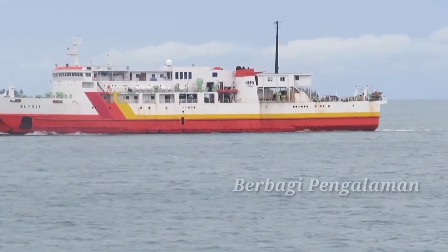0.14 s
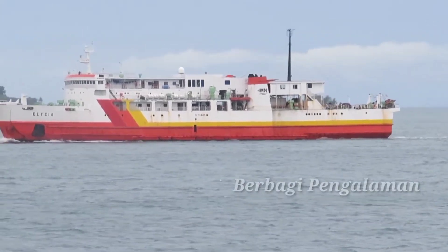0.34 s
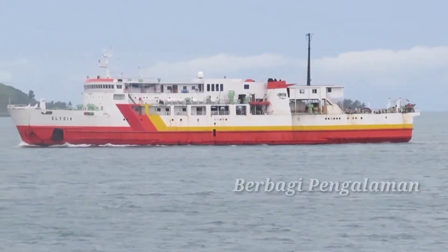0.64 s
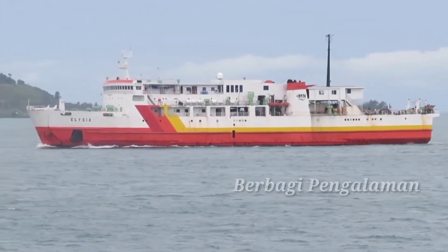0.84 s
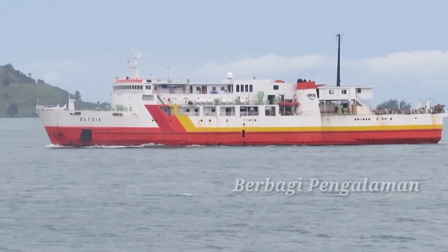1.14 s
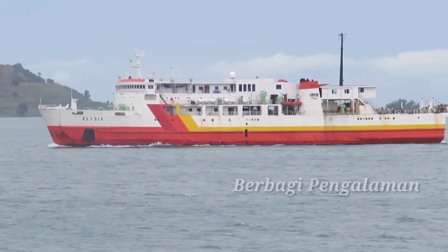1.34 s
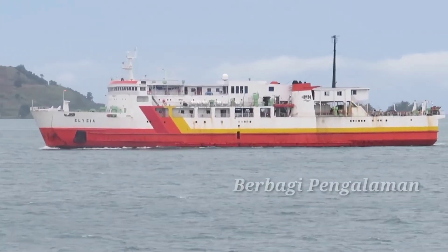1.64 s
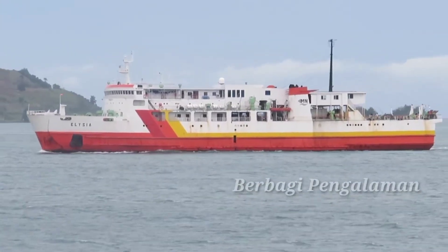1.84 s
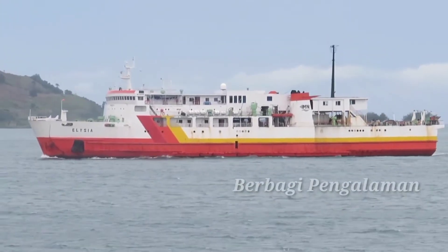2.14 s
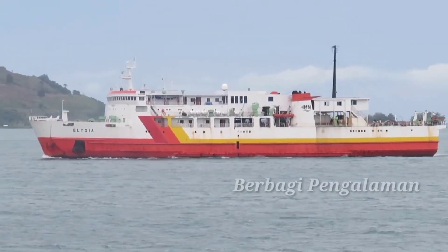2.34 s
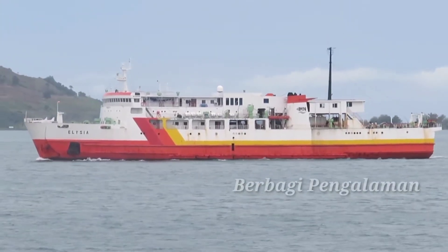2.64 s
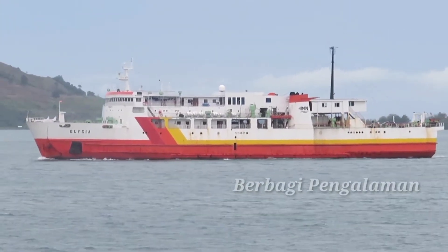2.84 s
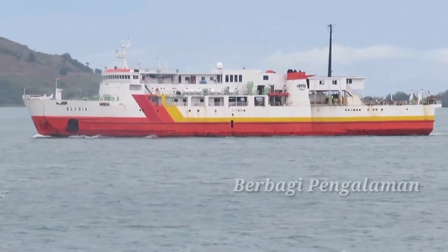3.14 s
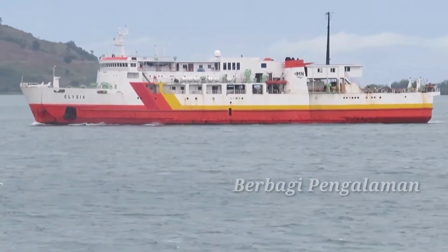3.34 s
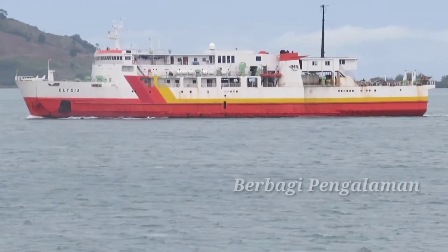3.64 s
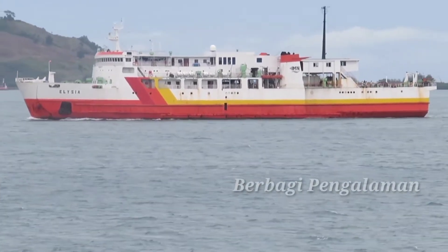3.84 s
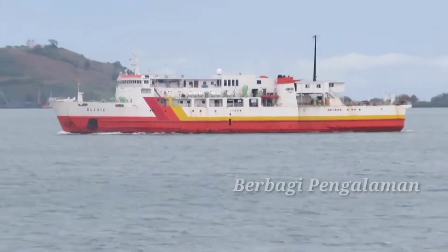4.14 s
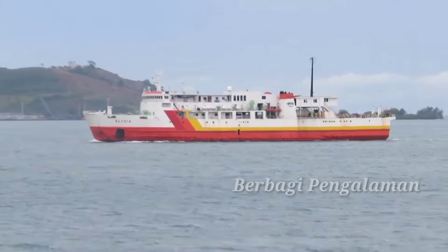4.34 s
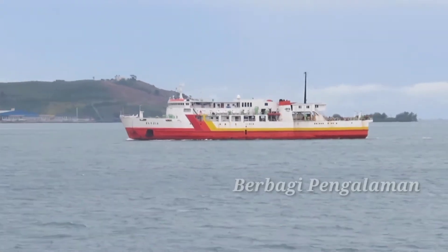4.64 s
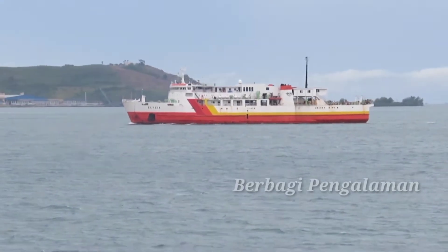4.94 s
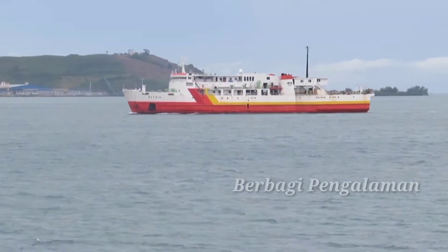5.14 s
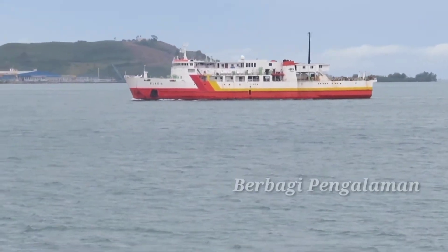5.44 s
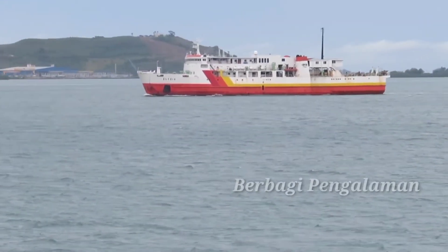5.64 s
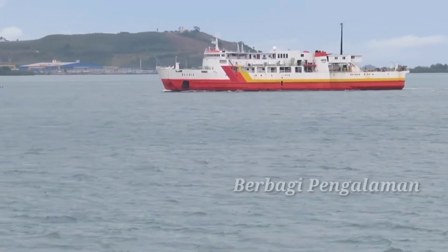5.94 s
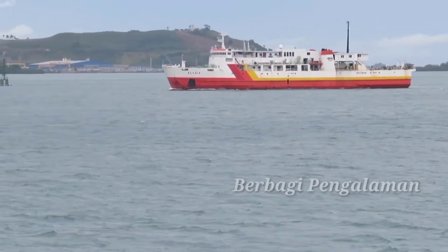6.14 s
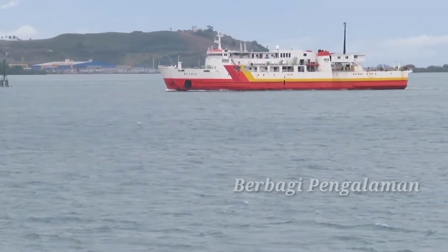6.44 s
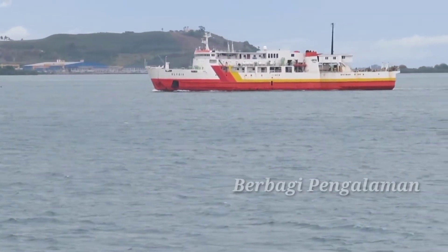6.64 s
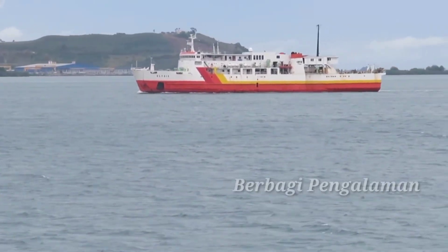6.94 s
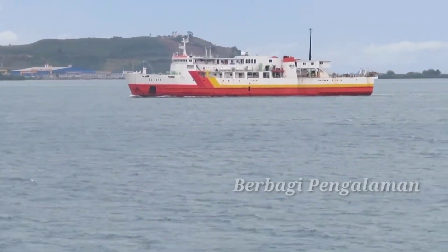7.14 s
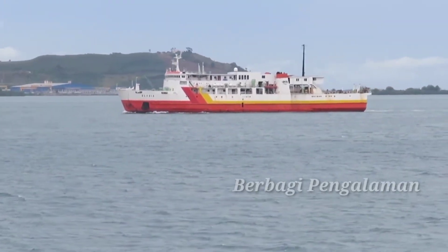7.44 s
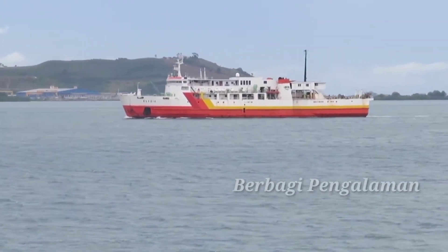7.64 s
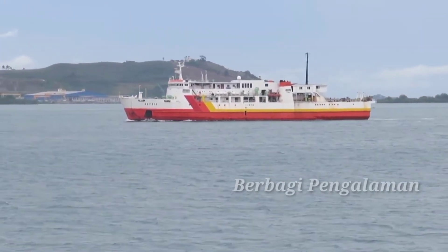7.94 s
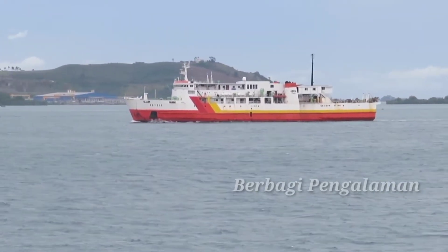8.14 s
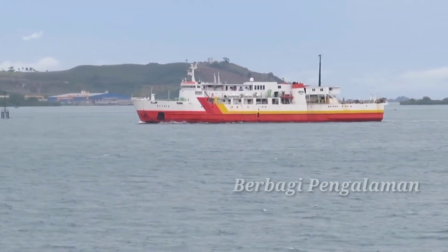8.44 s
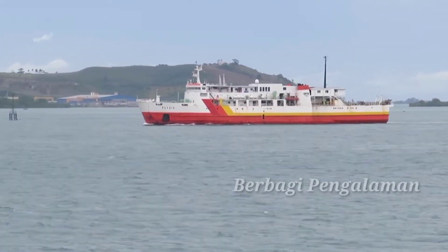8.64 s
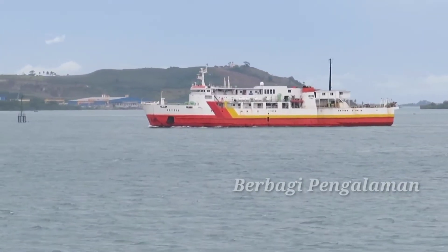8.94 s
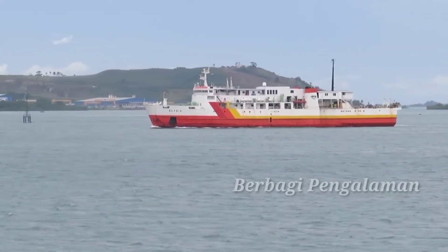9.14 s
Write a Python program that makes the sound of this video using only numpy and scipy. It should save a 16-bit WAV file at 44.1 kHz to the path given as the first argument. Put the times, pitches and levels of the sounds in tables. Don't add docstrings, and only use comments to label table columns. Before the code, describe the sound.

A ferry's diesel engine throbs and hums low and steady under hazy wash and wind, with dull metal booms and a brief camera zoom whine.

```python
import sys
import numpy as np
from scipy import signal
from scipy.fft import rfft, irfft, next_fast_len
from scipy.io import wavfile
from scipy.ndimage import uniform_filter1d

SR = 44100
rng = np.random.default_rng(int(sys.argv[2]) if len(sys.argv) > 2 else 0)


def to_wav(s):
    ch = np.atleast_2d(s).T
    pcm = np.round(np.clip(ch, -1, 1) * 32767)
    wavfile.write(sys.argv[1], SR, pcm.astype(np.int16))


def amplitude_ratio(level_db):
    exponent = np.asarray(level_db, float) / 20
    return 10 ** exponent


N = 410122
TIME = np.arange(N) / SR
PADDED = next_fast_len(N)
HZ = np.maximum(np.arange(PADDED // 2 + 1) * SR / PADDED, 1)
COARSE = 20
MOTOR_ON_S, FILTER_ON_S, ZOOM_END_S = 3.96, 4.11, 4.845


def in_time(rows):
    s, *columns = np.transpose(rows)
    return [np.interp(TIME, s, c) for c in columns]


def at_hz(rows, hz):
    f, *columns = np.transpose(rows)
    return [np.interp(np.log(hz), np.log(f), c) for c in columns]


def drift(rate, step=1):
    knots_per_s = 400
    knots = rng.standard_normal(int(N / SR * knots_per_s) + 900)
    r = np.exp(-2 * np.pi * rate / knots_per_s)
    slow = signal.lfilter([1], [1, -2 * r, r * r], knots)[800:]
    slow = (slow - slow.mean()) / slow.std()
    return np.interp(TIME[::step] * knots_per_s, np.arange(len(slow)), slow)


def tone(turns, db, wobble_db):
    level = amplitude_ratio((db + 0 * TIME)[::COARSE] + wobble_db * drift(0.41, COARSE))
    return np.sqrt(2) * level * np.sin(2 * np.pi * turns[::COARSE])


def narrow_noise(hz, width_hz):
    cut = signal.butter(2, width_hz / 2, fs=SR, output="sos")
    a, b = signal.sosfilt(cut, rng.standard_normal((2, len(hz) + 2000)))[:, 2000:]
    angle = 2 * np.pi * np.cumsum(hz) / SR
    band = a * np.cos(angle) + b * np.sin(angle)
    return band / band.std()


def struck(events, rise_s, gain_db):
    out = np.zeros(N)
    for s, db, hz, t60 in events:
        at = round(s * SR)
        t = TIME[:N - at][:SR // 2]
        envelope = amplitude_ratio(db + gain_db - 60 * t / t60) * (1 - np.exp(-t / rise_s))
        out[at:at + len(t)] += envelope * np.sin(2 * np.pi * hz * t)
    return out


# time of change in seconds, rms level in dB before, and after.
FIRING = [
    (2.4, -31, -41),
    (2.4, -21.5, -28),
    (5.1, -39.5, -25),
]


def firing_db():
    turn_s = .3
    return [before_db + (after_db - before_db) * (1 + np.tanh((TIME - s) / turn_s)) / 2
            for s, before_db, after_db in FIRING]


# time in seconds, four-stroke cycles per second.
SPEED = [(0, 3.176), (1.2, 3.178), (2.3, 3.1777), (3.5, 3.171), (4.6, 3.167), (5.8, 3.166), (7, 3.171),
         (8.1, 3.1735), (9.3, 3.174)]
UNEVEN_DB = [-44.5, -57.5, -36, -33.5, -36.5, -45, -26.5, -93.5, -29, -42, -31, -27, -31, -42, -34, -84,
             -48, -50.5, -48.5, -47.5, -34.5, -38.5, -44, -34, -52, -41.5, -35, -41]
# order, rms level in dB.
UPPER_ORDERS = [(40, -48), (43, -46), (45, -49), (48, -50), (51, -47), (61, -53), (62, -49), (63, -50)]
# time in seconds, rms level in dB.
GENERATOR_DB = [(0, -15.5), (2.3, -16), (4.8, -14), (7, -16), (9.3, -15)]
# harmonic number, rms level in dB.
AUXILIARY = [(3, -40), (4, -33), (8, -42), (12, -48), (16, -50), (24, -44)]


def engines():
    generator_hz, auxiliary_hz = 75.06, 12.11
    opposed_s = 5.84
    cycle = np.cumsum(in_time(SPEED)[0]) / SR
    out = sum(tone(8 * (k + 1) * cycle, db, wobble_db=.4) for k, db in enumerate(firing_db()))
    for k, db in [*enumerate(UNEVEN_DB, 9), *UPPER_ORDERS]:
        out += tone(k * cycle + rng.random(), db, wobble_db=0.75)

    generator = generator_hz * (TIME - opposed_s) + 24 * cycle[round(opposed_s * SR)] + .5
    hum_db = in_time(GENERATOR_DB)[0]
    out += tone(generator, hum_db, wobble_db=0.5)
    out += tone(2 * generator, hum_db - 26, wobble_db=2.0)
    for k, db in AUXILIARY:
        out += tone(k * auxiliary_hz * TIME + rng.random(), db, wobble_db=1.0)
    return signal.resample_poly(out, COARSE, 1, padtype="line")[:N]


PANEL_HZ = (286.2, 383, 453)
# start in seconds, peak level in dB, upper modes relative to the lowest in dB.
BOOMS = [(1.228, -28.5, -15.5), (1.992, -27, -6.5), (2.843, -22, -5.5), (2.942, -26.5, -8.5),
         (3.21, -34, -1), (3.628, -29.5, -4), (4.464, -18.5, -16.5), (4.59, -24, -20.5), (4.932, -32, -14),
         (5.175, -25, -3), (5.332, -29.5, -3), (5.859, -24, -5), (6.534, -27.5, -12.5), (7.179, -31.5, -18),
         (7.801, -28, -1.5), (8.528, -26, -11.5), (9.188, -31, 4)]


def panels():
    modes = []
    for s, db, upper_db in BOOMS:
        low, middle, high = PANEL_HZ * (1 + .02 * rng.standard_normal(3))
        t60 = 0.59 - 0.0281 * max(db + 27.5, 0)
        modes += [(s, db, low, t60),
                  (s, db + upper_db, middle, t60),
                  (s, db + upper_db - 4.5, high, 1.1 * t60)]
    return struck(modes, rise_s=0.0059, gain_db=2.5)


# start in seconds, length in seconds, pitch in Hz, rms level in dB.
WHISTLES = [(0, 0.13, 4900, -55), (3.895, .07, 6600, -57), (4.06, 0.05, 6600, -61.5),
            (4.097, .064, 4700, -57), (4.996, .22, 3970, -55), (6.1, .091, 4370, -58)]
# start in seconds, length in seconds, pitch in Hz, rms level in dB.
RUBS = [(.13, 0.13, 5300, -56), (.293, .12, 5030, -55), (1.6, 0.23, 5700, -59), (1.89, .22, 5120, -59.5),
        (2.13, .43, 4840, -55.5), (5.9, .2, 5360, -59), (8.941, .047, 3530, -52)]
# start in seconds, length in seconds, pitch in Hz, rms level in dB.
SCUFFS = [
    (2.805, 0.072, 1600, -39.5),
    (3.95, .2, 4430, -49.5),
    (8.912, .05, 1600, -40.5),
]
# start in seconds, length in seconds, start and end pitch in Hz, rms level in dB.
SQUEAK = [(3.852, .064, 3890, 3860, -42), (3.882, .055, 3530, 3580, -40), (3.897, .05, 4130, 4270, -44),
          (3.925, 0.041, 4800, 5110, -45), (3.93, .033, 4300, 4690, -43)]


def friction():
    slides = [(s, length, hz, end_hz, .055 * hz, db) for s, length, hz, end_hz, db in SQUEAK]
    for rows, width in [(WHISTLES, 0.017), (RUBS, .07), (SCUFFS, 0.31)]:
        for s, length, hz, db in rows:
            slides.append((s, length, hz, hz * (1 - 0.019), width * hz, db))
    out, flutter = np.zeros(N), drift(18.0)
    for s, length, start_hz, end_hz, width_hz, db in slides:
        at, count = round(s * SR), round(length * SR)
        level = amplitude_ratio(db + 1.6 * flutter[at:at + count]) * np.hanning(count) ** .35
        out[at:at + count] += level * narrow_noise(np.linspace(start_hz, end_hz, count), width_hz)
    return out


# start in seconds, peak level in dB, pitch in Hz, 60 dB decay in seconds.
CLICKS = [
    (3.957, -25, 2240, 0.02),
    (4.1, -33, 4630, .02),
]


def lever_clicks():
    out = struck(CLICKS, rise_s=.0003, gain_db=-1.0)
    at = round(CLICKS[0][0] * SR)
    crack = narrow_noise(np.full(400, 4500.), 4500) * np.exp(-TIME[:400] / .0018)
    out[at:at + 400] += amplitude_ratio(-39) * crack
    return out


# centre in Hz, width in Hz, rms level in dB.
MOTOR = [(2200, 150, -57.5), (2520, 150, -66), (3770, 760, -58), (4300, 120, -62.5), (4920, 430, -63),
         (6600, 150, -73.5)]


def lens_motor():
    out = np.zeros(N)
    on, off = round(MOTOR_ON_S * SR), round(ZOOM_END_S * SR)
    for hz, width_hz, db in MOTOR:
        level = amplitude_ratio(db + 1.6 * drift(15.0)[on:off])
        out[on:off] += level * narrow_noise(np.full(off - on, hz), width_hz)
    return out


# start in seconds, depth in dB.
DUCKS = [
    (.43, 1.5),
    (.775, 1),
    (1.39, 3.5),
    (2.5, -0.4),
    (8.97, 2),
]


def camera_ducking():
    recovery_s = 0.3
    return sum(-db * (TIME >= s) * np.exp(-np.maximum(TIME - s, 0) / recovery_s) for s, db in DUCKS)


# frequency in Hz, level in dB per Hz.
SEA_NOISE = [(16, -60.5), (22, -61), (30, -56), (40, -48.5), (55, -43), (75, -43), (98, -48), (120, -50),
             (150, -53),
             (190, -54), (235, -52.5), (290, -56), (330, -55.5), (400, -57), (500, -62.5), (720, -64),
        (1100, -68.5), (2000, -76), (2700, -78), (4500, -87), (7000, -95), (10000, -101), (15000, -116)]
# time in seconds, level in dB relative to the mean.
WASH = [(0, 1.5), (.42, 4), (.8, 1.5), (1.38, 0.5), (1.9, 0), (2.35, 0.5), (2.9, -1), (3.5, 0), (3.9, 0.5),
        (4.86, 1), (5.4, 3.5), (6, 1), (6.6, 0), (6.95, 0.5), (7.2, -2), (7.7, 1), (8.1, 1), (8.95, 1)]
# frequency in Hz, share.
FOLLOWS = [(300, 0.13), (850, 0.35), (2000, .8), (4500, 1.6), (8000, 0.66)]


def sea(patchy_db):
    density = amplitude_ratio(at_hz(SEA_NOISE, HZ)[0]) * np.sqrt(SR / 2)
    spectrum = rfft(rng.standard_normal((2, PADDED))) * density
    wash_db, duck_db = in_time(WASH)[0], camera_ducking()
    place = np.clip(np.log2(HZ / 250) * 1.5, 0, 9)
    out, spray = 0, drift(17.0)
    for k in range(10):
        hz = 250 * 2 ** (k / 1.5)
        spray_share = np.interp(np.log(hz), np.log([300, 850, 3500, 8000]), (0, .2, 0.49, 1.3))
        swell = at_hz(FOLLOWS, hz)[0] * (wash_db - wash_db.mean()) + duck_db - duck_db.mean()
        flicker = patchy_db * (spray_share * spray + 1.2 * drift(3.2))
        band = irfft(spectrum * np.clip(1 - abs(place - k), 0, 1), PADDED)[:, :N]
        out = out + amplitude_ratio(swell + flicker) * band
    return out


# frequency in Hz, likeness from 0 to 1, left lead in radians, left over right in dB.
PAIR = [(40, 0.99, 0, -0.5), (130, 0.97, 0.1, -0.5), (300, 1, 0.46, -0.3), (460, 0.96, 0.47, 1.8),
        (497, 0.99, 0, 0), (1500, 0.97, 0.33, 2), (3300, 0.73, 0.21, 1.5), (5000, 0.4, 0.93, 1.6),
        (7300, 0.5, 1.6, 0.5), (9000, 0.3, 2.5, 0.5), (11000, .85, 4, -0.5), (15000, 0.7, 4, 0)]


def scene():
    alike, lead, balance_db = at_hz(PAIR, HZ)
    alike = np.clip(alike, 0, 1)
    hull = engines() + panels()
    join = np.linspace(hull[-1], hull[0], PADDED - N)
    ship = rfft(np.r_[hull, join])
    near = rfft(friction() + lever_clicks() + lens_motor(), PADDED)
    common, own = rfft(sea(patchy_db=0.69), PADDED)
    left = (common + ship + near) * amplitude_ratio(balance_db / 2)
    right = (alike * common + ship + near) * np.exp(-1j * lead) + np.sqrt(1 - alike ** 2) * own
    return irfft([left, right * amplitude_ratio(-balance_db / 2)], PADDED)[:, :N]


# frequency in Hz, share of the mid heard, share of the side heard.
EXPECTED = [(790, 0, 0.012), (1300, 0.72, .3), (1900, 0.8, .45), (3000, 1, .5), (5300, 0.88, .6),
            (7500, 0.73, .45), (10500, 0.1, .1)]


def zoom_filter(x, ragged=0.24, floor_db=-11, settle_s=0.022):
    on, off = round(FILTER_ON_S * SR), round(ZOOM_END_S * SR)
    mid_side = np.array([x[0] + x[1], x[0] - x[1]]) / 2
    hz, _, frames = signal.stft(mid_side[:, on - 2048:off + 2048], SR, nperseg=1024)
    power = uniform_filter1d(abs(frames) ** 2, size=5) + 1e-20
    heard = np.exp(uniform_filter1d(np.log(power.mean(axis=2)), size=21))

    jags = np.repeat(rng.standard_normal(len(hz)), 3)[:len(hz)]
    jagged = np.exp(ragged * np.minimum(4000 / (hz + 1), 1) * jags)
    share = np.clip(at_hz(EXPECTED, hz + 1), 0, 9) * jagged
    gain = np.maximum(1 - (share * heard)[..., None] / power, amplitude_ratio(floor_db) ** 2) ** .5
    thinned = signal.istft(frames * gain, SR, nperseg=1024)[1][:, 2048:2048 + off - on]

    engaged = 1 - np.exp(-TIME[:off - on] / settle_s)
    mid_side[:, on:off] += engaged * (thinned - mid_side[:, on:off])
    return np.array([mid_side[0] + mid_side[1], mid_side[0] - mid_side[1]])


def low_pass(x):
    return signal.sosfilt(signal.butter(12, 15130, fs=SR, output="sos"), x)


def record(dry, top=1.12):
    rounded = top * np.tanh(zoom_filter(dry) * amplitude_ratio(0.4) / top)
    return low_pass(rounded)


dry = scene()
out = record(dry)
to_wav(out)
```